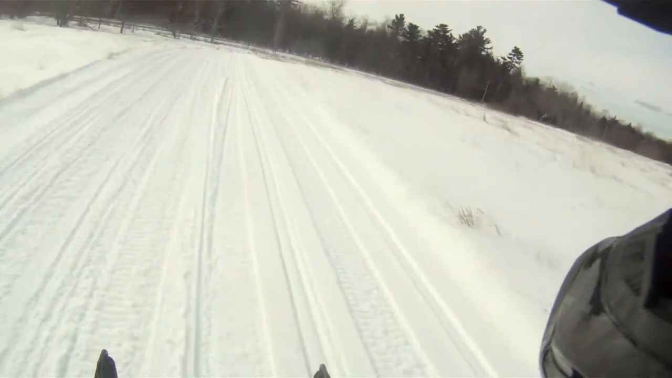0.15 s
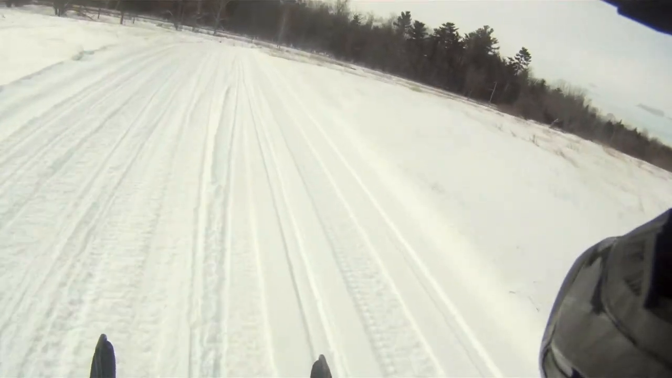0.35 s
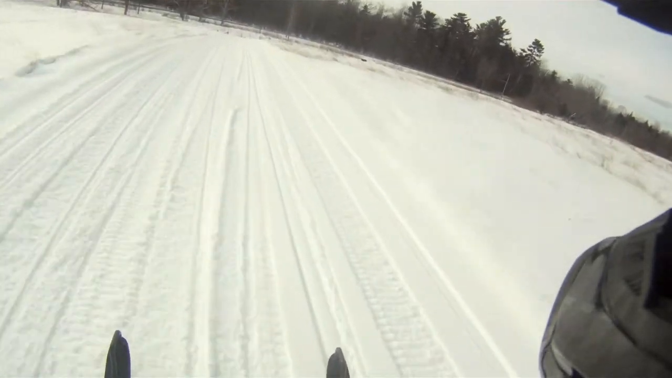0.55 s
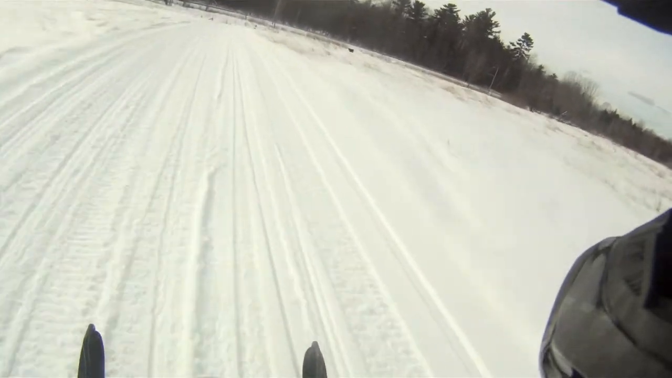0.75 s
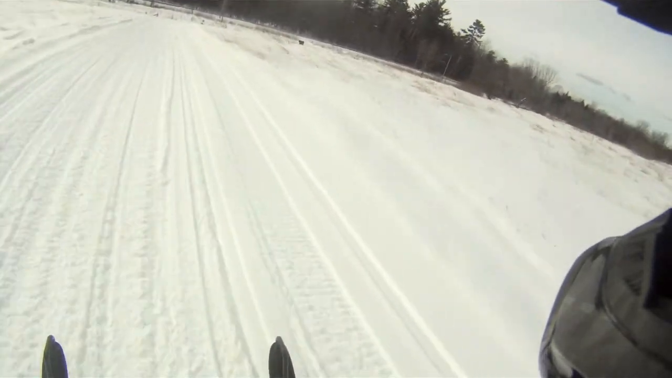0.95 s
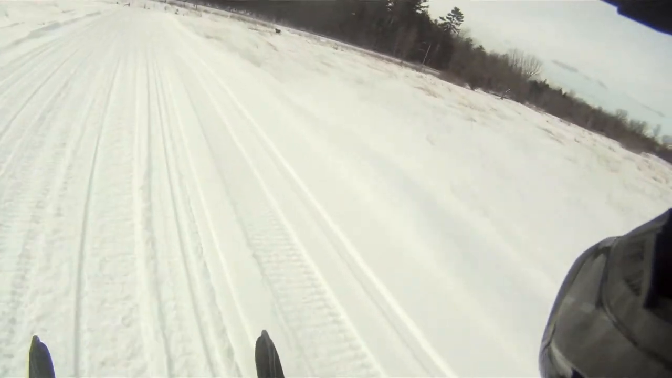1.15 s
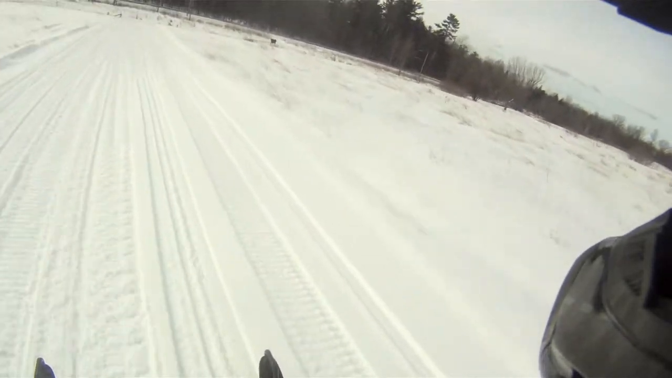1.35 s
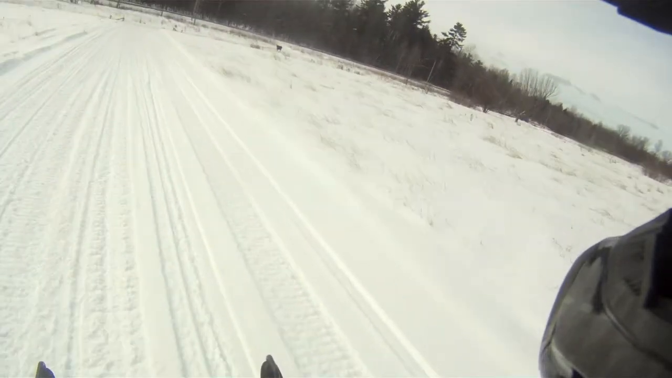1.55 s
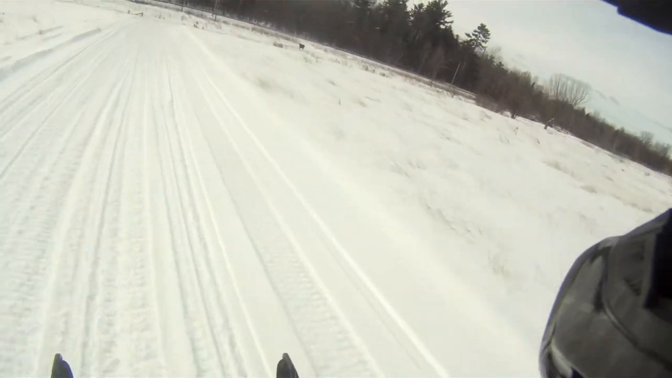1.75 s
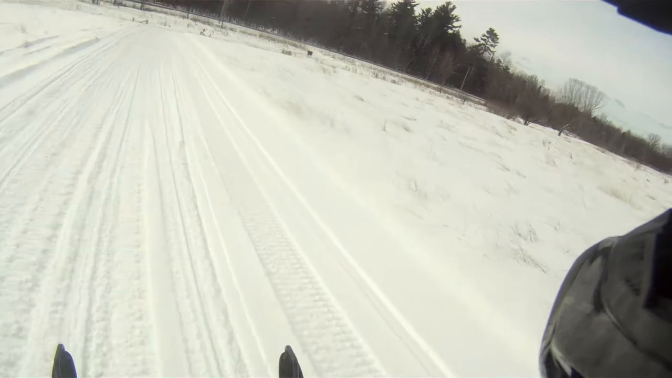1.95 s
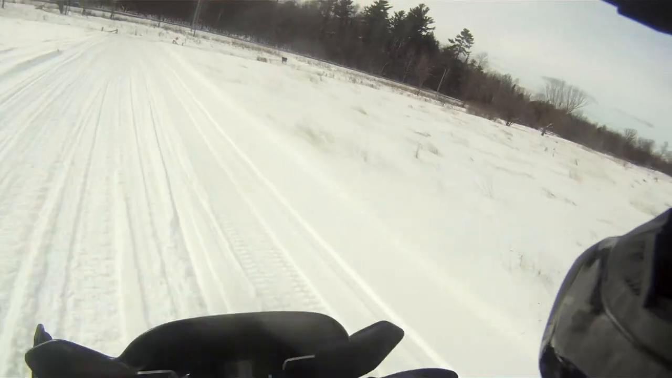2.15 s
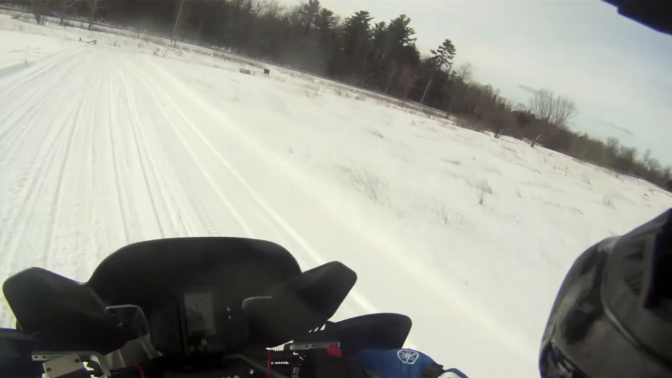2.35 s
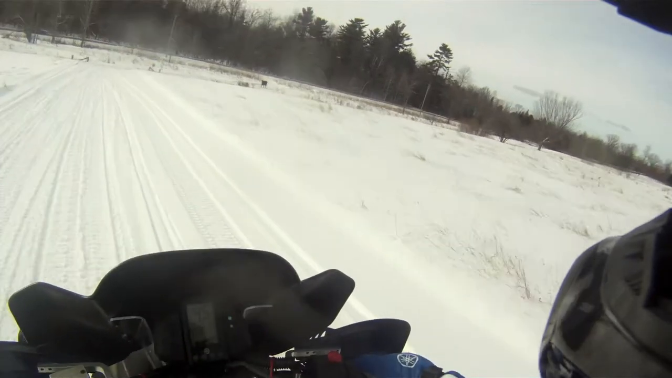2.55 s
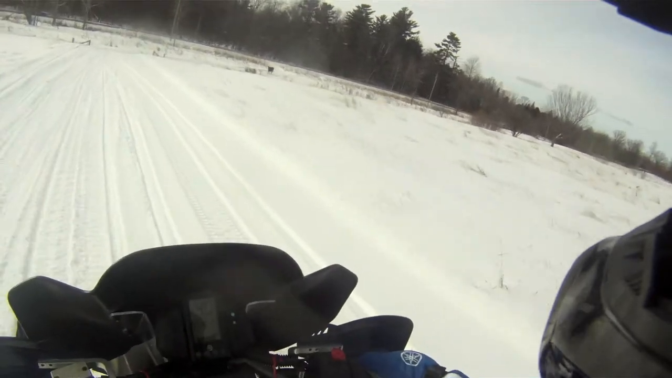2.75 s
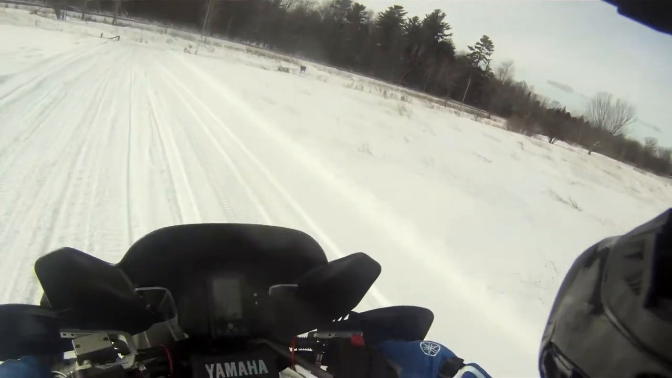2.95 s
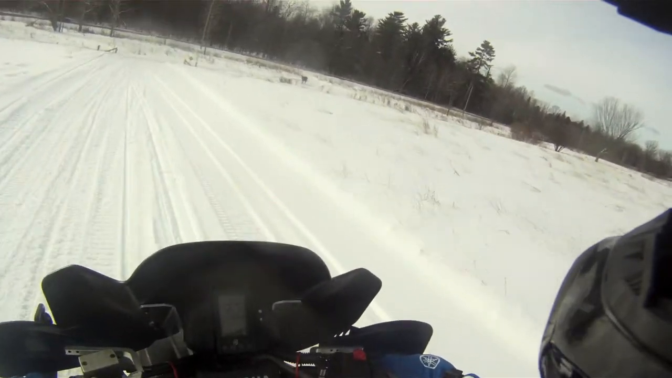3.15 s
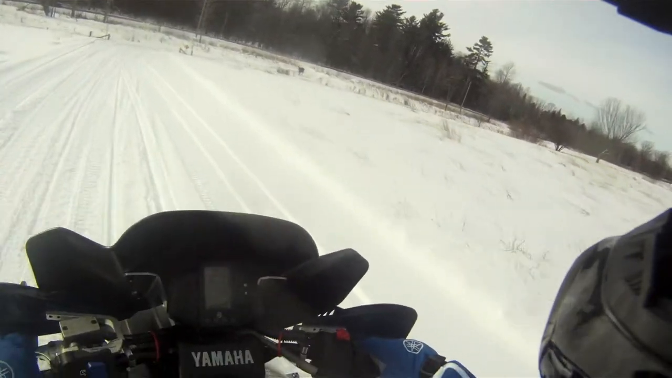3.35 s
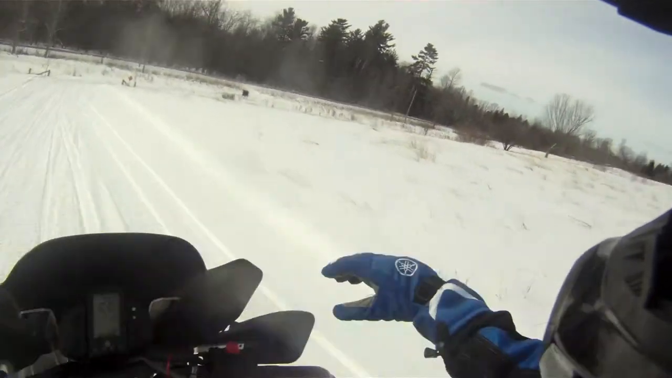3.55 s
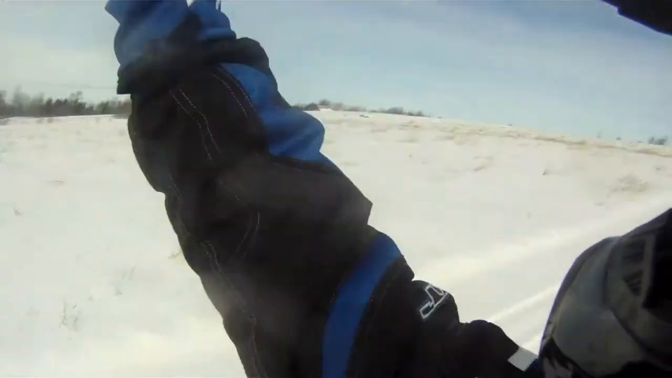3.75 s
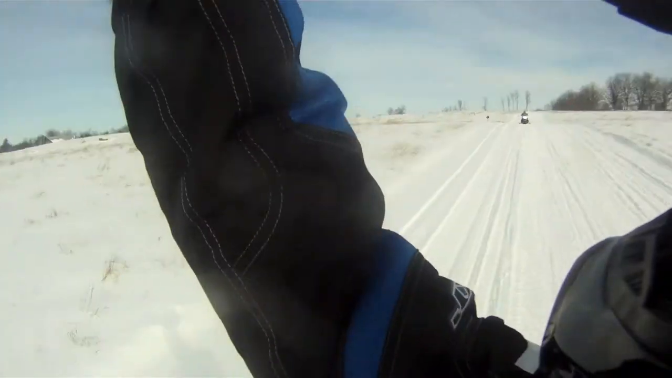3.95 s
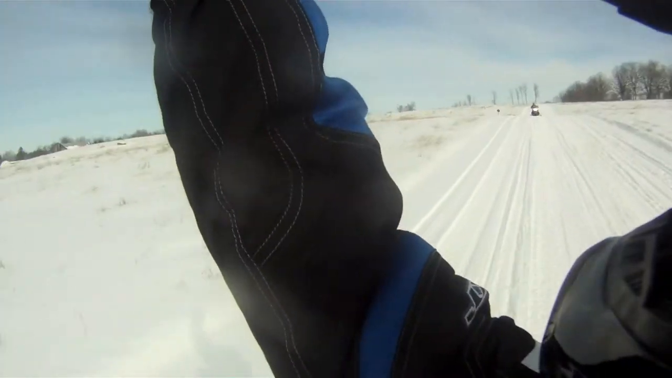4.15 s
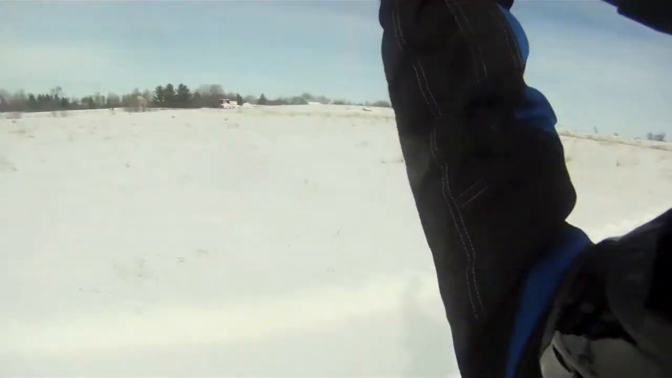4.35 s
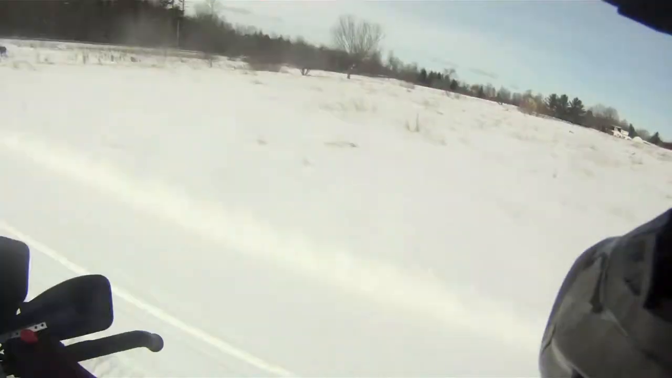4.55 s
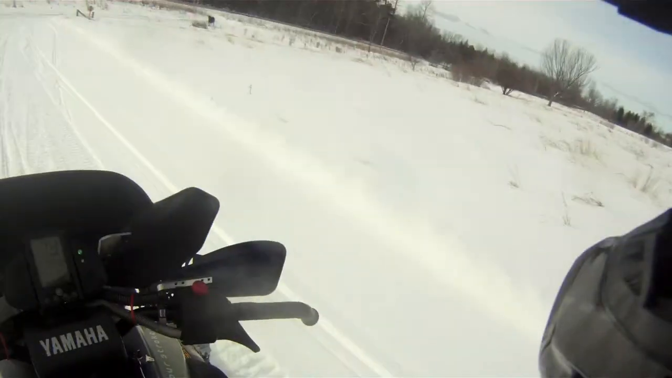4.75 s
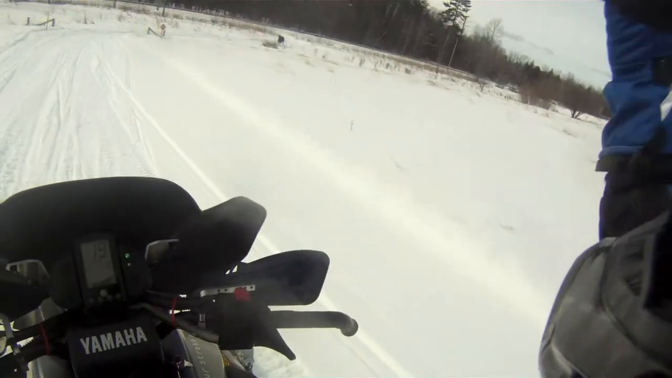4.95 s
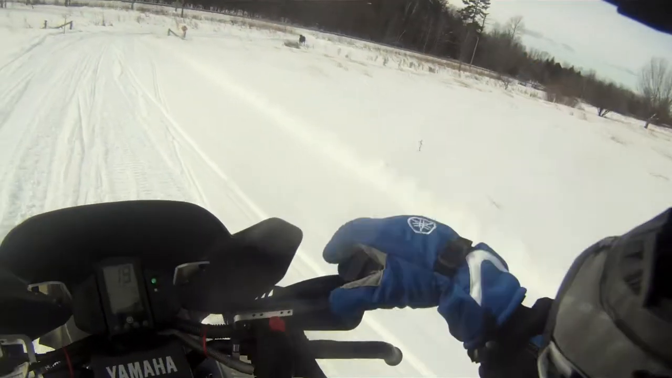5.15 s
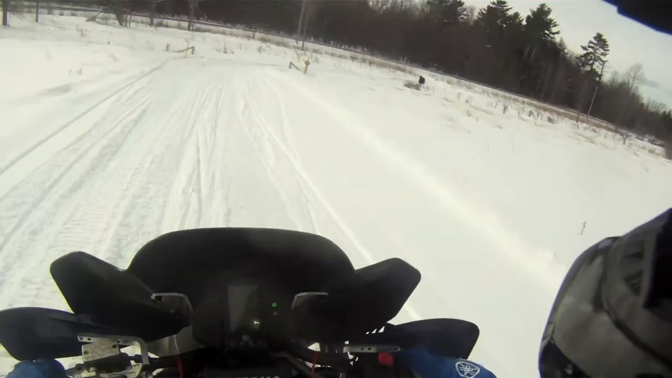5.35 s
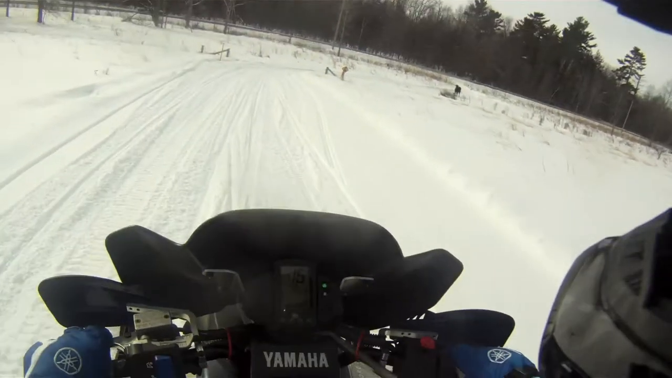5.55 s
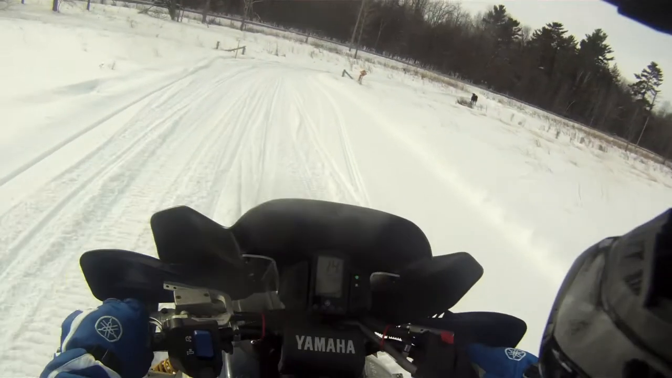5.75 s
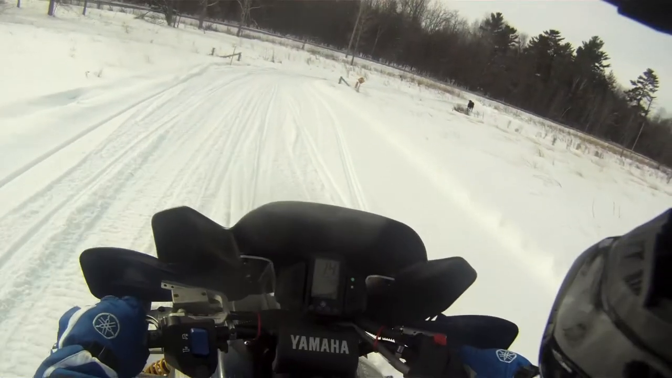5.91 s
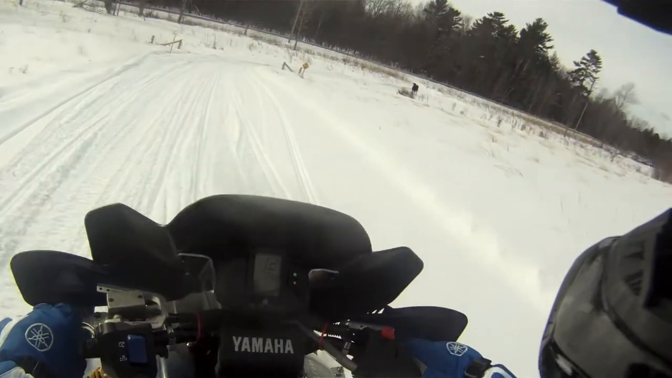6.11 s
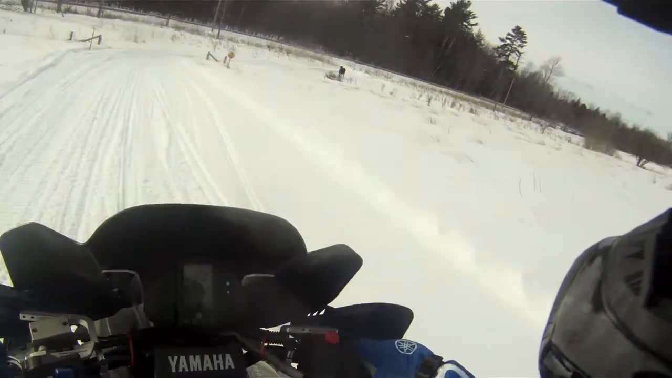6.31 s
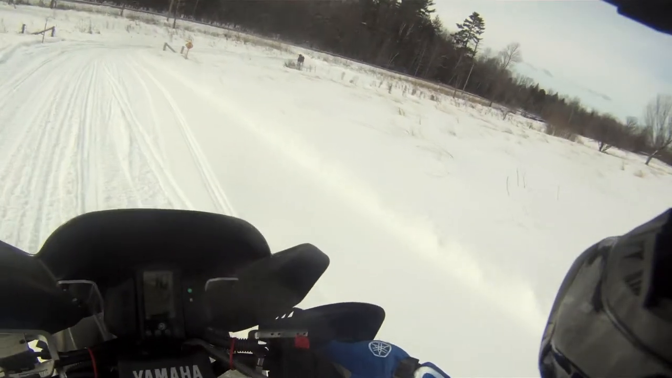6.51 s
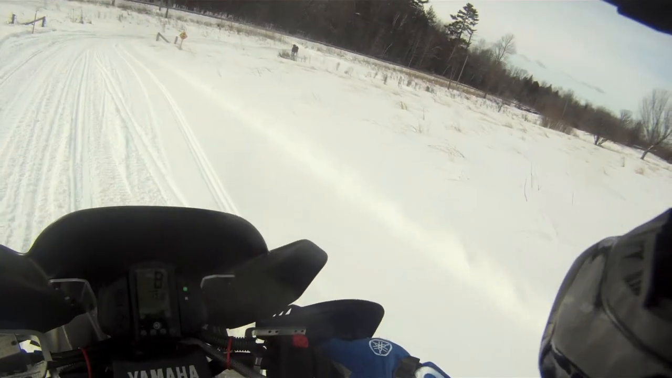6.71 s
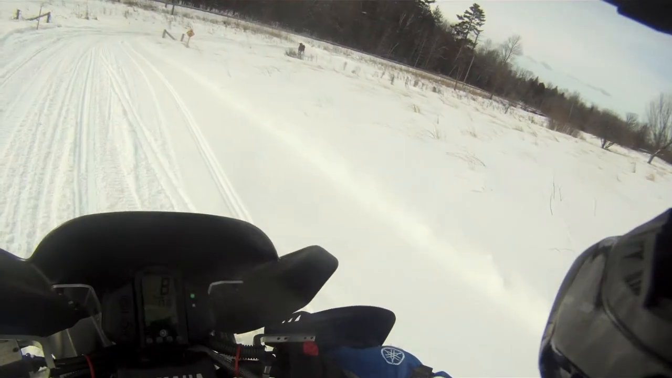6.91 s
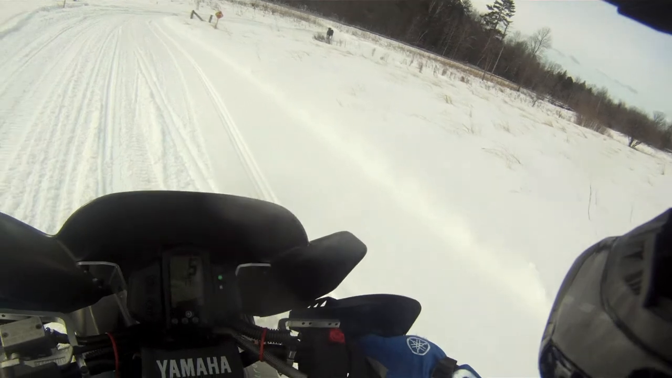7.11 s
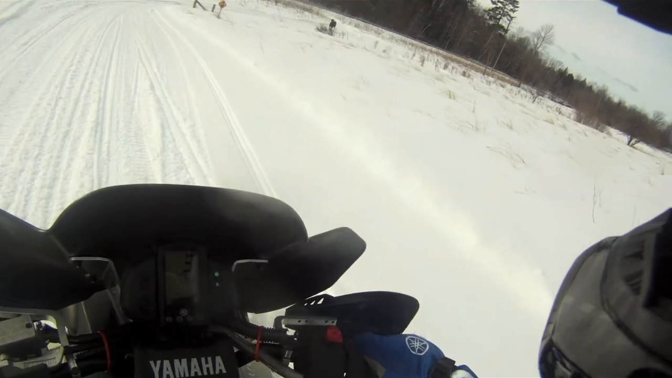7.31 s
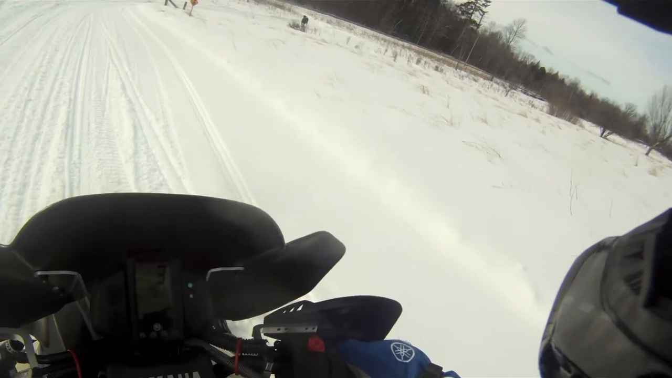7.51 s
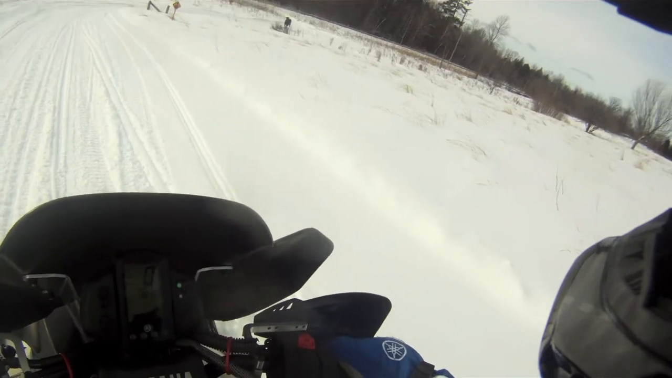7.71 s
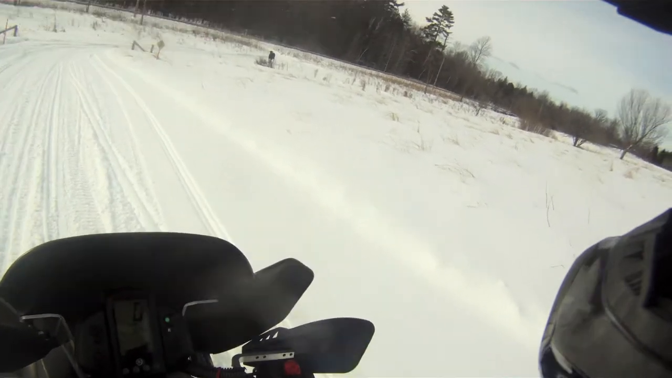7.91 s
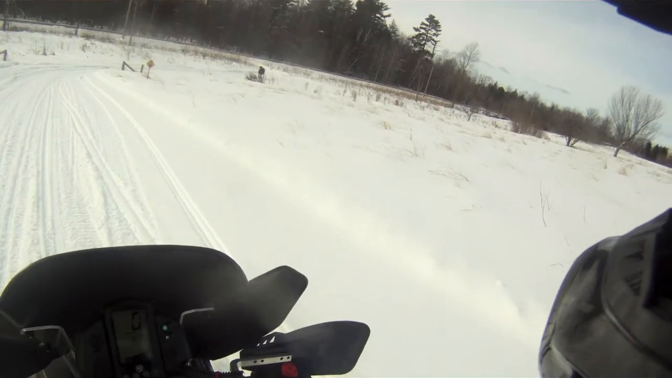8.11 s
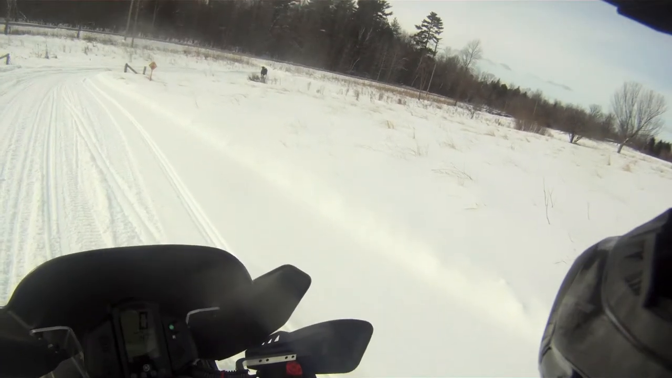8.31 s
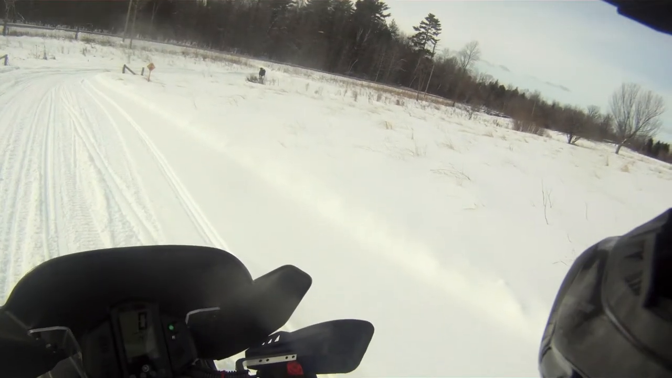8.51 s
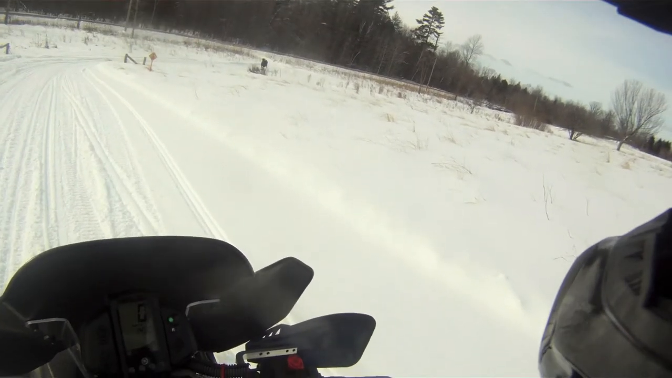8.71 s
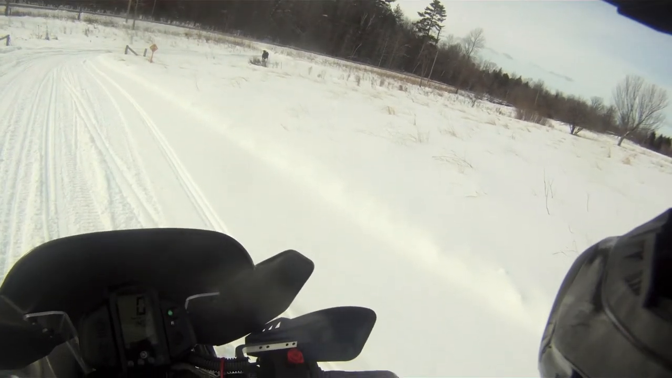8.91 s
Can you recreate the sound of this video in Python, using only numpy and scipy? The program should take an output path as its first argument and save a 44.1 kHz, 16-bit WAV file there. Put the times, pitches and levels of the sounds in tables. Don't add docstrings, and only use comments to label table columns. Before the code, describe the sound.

Heard from the rider's helmet, rushing snow and a raspy engine sink together, a brake groans downward, and a low lumpy idle remains.

```python
import sys
import numpy as np
from scipy import signal
from scipy.fft import rfft, irfft, next_fast_len
from scipy.io import wavfile
from scipy.ndimage import uniform_filter1d, map_coordinates

SR = 44100
rng = np.random.default_rng(int(sys.argv[2]) if len(sys.argv) > 2 else 0)


def transcribe(u):
    v = np.clip(np.atleast_2d(u).T, -1, 1)
    q = np.round(v * 32767).astype(np.int16)
    wavfile.write(sys.argv[1], SR, q)


def voltage_ratio(decibels):
    exponent = np.asarray(decibels, float) / 20
    return 10 ** exponent


N = 399987

# centre in Hz, width in Hz, level in dB.
CASE_MODES = [(1149, 67, 7.5), (1540, 116, 11), (1898, 241, 8), (3057, 310, -2), (3547, 99, 0.5),
              (5064, 466, 6.5)]


def unit(x):
    return x / np.sqrt(np.mean(x ** 2) + 1e-20)


def along(points, hz):
    f, v = np.transpose(points)
    return np.interp(np.log(hz + 1), np.log(f + 1), v)


def law(rows, control):
    at, *columns = np.transpose(rows)
    return [np.interp(control, at, column) for column in columns]


def curves(rows):
    return law(rows, np.arange(N) / SR)


def wobble(rate, count=N):
    knots = rng.standard_normal(int(count * rate / SR) + 4)
    return map_coordinates(knots, [np.arange(count) * rate / SR])


def filtered(x, response):
    m = next_fast_len(N + SR // 2)
    return irfft(rfft(x, m) * response(np.fft.rfftfreq(m, 1 / SR)), m)[..., :N]


def modes(table, f):
    return np.array([voltage_ratio(db) * 1j * f * w / (c * c - f * f + 1j * f * w) for c, w, db in table])


def rush(spectrum, patchy_db):
    z = signal.stft(rng.standard_normal(N), nperseg=512)[2]
    field = uniform_filter1d(rng.standard_normal(z.shape), size=5, axis=0)
    field = uniform_filter1d(field, size=6, axis=1)
    white = signal.istft(z * voltage_ratio(patchy_db * unit(field)), nperseg=512)[1][:N]
    return unit(filtered(white, lambda hz: voltage_ratio(along(spectrum, hz))))


def exhaust(cycle):
    # place 0-1, level in dB.
    firings = [
        (.99, -.5),
        (.23, .3),
    ]
    # delay in seconds, level in dB.
    answers = [
        (.0175, -10.5),
        (.0358, -19),
    ]
    # centre in Hz, width in Hz, level in dB.
    muffler = [(96, 30, -14), (188, 36, -2), (316, 30, -2), (425, 40, -3)]
    pushes = np.zeros(N + SR)
    for place, db in firings:
        at = np.flatnonzero(np.diff(np.floor(cycle - place)))
        pushes[at] = voltage_ratio(db + 1.2 * rng.standard_normal(N)[at])
    second_firing = at
    for delay_s, db in answers:
        pushes[second_firing + round(delay_s * SR)] += voltage_ratio(db) * pushes[second_firing]

    def pipe(f):
        rounded = np.exp(-(f / 210) ** 2) * f * f / (f * f + 35 ** 2)
        returned = .7 * np.exp(-2j * np.pi * f * .0052 - (f / 900) ** 2)
        suction = .38 * np.exp(2j * np.pi * f * .0012)
        return rounded * (1 - returned - suction) * (1 + modes(muffler, f).sum(axis=0))

    return unit(filtered(pushes[:N], pipe))


def crank(cycle, speed):
    # order, throttle open in dB, throttle shut in dB, speed below which it fades in cycles
    # per second, loss in dB per cycle per second.
    orders = [(1, -41, -51, 23, 5), (3, -49, -34, 36.4, 1.8), (4, -34, -32.5, 48, 0.6),
              (5, -43.5, -71, 45, 10), (8, -48, -46.5, 41, 10)]
    shut_at_s, shut_takes_s = 1.46, .1
    t = np.arange(N) / SR
    shut = np.clip((t - shut_at_s) / shut_takes_s + .5, 0, 1)
    boom_db = 13 * np.exp(-t / 0.28)
    out = np.zeros(N)
    for k, open_db, shut_db, fade_hz, loss in orders:
        db = open_db + shut * (shut_db - open_db) - loss * np.maximum(fade_hz - speed, 0)
        db = db + boom_db * (k == 5)
        level = (speed > 16) * voltage_ratio(db + 3 + 1.5 * wobble(12))
        out += level * np.sin(2 * np.pi * k * cycle + .3 * wobble(9))
    return out


def hum(cycle, fourth_db, eighth_db):
    fourth = np.cos(2 * np.pi * (4 * cycle + .05))
    eighth = np.cos(2 * np.pi * (8 * cycle - .15))
    return voltage_ratio(fourth_db + 2.5) * fourth + voltage_ratio(eighth_db) * eighth


def valves(cycle):
    # start 0-1, level in dB.
    bursts = [
        (.76, 0),
        (.99, .5),
        (.22, -8),
        (.49, -16),
    ]
    # frequency in Hz, level in dB per Hz.
    rasp = [(300, -49), (620, -21), (900, -11), (1300, -5.5), (1700, -6), (2300, -10.5), (2700, -5.5),
            (3600, -12), (4300, -17.5), (5400, -25), (5900, -27.5)]
    gate = np.zeros(N)
    for start, db in bursts:
        since = (cycle - start) % 1
        strength_db = rng.standard_normal(1000)[np.floor(cycle - start + 2).astype(int)]
        rise = 1 - np.exp(-(since / .052) ** 2)
        gate += voltage_ratio(db + strength_db) * rise * np.exp(-(since / .21) ** 2)
    grit = voltage_ratio(0.2 * wobble(300))
    return unit(gate * grit * rush(rasp, patchy_db=1.4))


def whine(table, tones_db, blur):
    fade_s = .025
    t, start_s, end_s = np.arange(N) / SR, table[0][0], table[-1][0]
    sounding = np.clip(np.minimum(t - start_s, end_s - t) / fade_s + 1, 0, 1)
    span = sounding > 0
    hz, level_db = (c[span] for c in curves(table))
    n = len(hz)
    unsteady_hz = hz * (1 + blur * wobble(110, count=n) + .003 * wobble(14, count=n))
    turn = 2 * np.pi * np.cumsum(unsteady_hz) / SR
    grid = np.arange(100, 6000, 10.)
    lift = np.abs(1 + modes(CASE_MODES, grid).sum(axis=0)) ** 1.08
    tones = np.zeros(n)
    for k, db in enumerate(tones_db):
        chatter = voltage_ratio(2.8 * wobble(45, count=n) + .4 * k * wobble(9, count=n))
        level = voltage_ratio(level_db + db + 3) * chatter * np.interp((k + 1) * hz, grid, lift)
        tones += level * np.sin((k + 1) * turn)
    out = np.zeros(N)
    out[span] = tones
    return sounding * out


def drive():
    # time in seconds, pitch in Hz, level in dB.
    belt = [
        (2.05, 849.3, -48),
        (2.17, 809, -47.5),
        (2.25, 775, -42),
        (2.38, 700, -41),
        (2.63, 649, -43.5),
        (2.72, 615, -51),
        (2.92, 572, -49),
        (3.2, 530, -53.5),
        (3.75, 495, -52.5),
    ]
    high_whistle = [
        (3.8, 3310, -54),
        (4.05, 3310, -48),
        (4.25, 3370, -47),
        (4.31, 3260, -50),
    ]
    belt_tones_db = (3, -7.5, -3.5)
    return whine(belt, belt_tones_db, blur=0.01888) + whine(high_whistle, (-3,), blur=0.0216)


def brake():
    # time in seconds, pitch in Hz, level in dB.
    first = [
        (4.34, 777.4, -50),
        (4.36, 747, -44),
        (4.42, 700, -44),
        (4.5, 698, -43.5),
        (4.55, 743, -43.5),
        (4.84, 724, -43.5),
        (4.92, 692, -45),
        (5.04, 649, -45),
        (5.25, 627, -49.5),
    ]
    second = [
        (5.33, 588, -45),
        (5.4, 575, -43),
        (5.5, 558, -43),
        (5.54, 528, -46),
        (5.7, 489, -44),
        (6.1, 418, -54),
        (6.42, 352, -53),
        (6.7, 288, -60),
        (7.12, 186, -58),
    ]
    other_pad = [
        (5.1, 1640, -60),
        (5.2, 1600, -42),
        (5.3, 1540, -50),
        (5.5, 1430, -39),
    ]
    first_tones_db = (-9, 0, -30, -6)
    second_tones_db = (-18, 0, -24, -23)
    squeezes = whine(first, first_tones_db, blur=0.0191) + whine(second, second_tones_db, blur=0.01547)
    return squeezes + whine(other_pad, (-12,), blur=0.00736)


def snow(hiss_db):
    # frequency in Hz, level in dB per Hz.
    hiss_colour = [(150, -53), (330, -9), (480, -30), (620, -14.5), (900, -8), (1300, -2), (1700, -7.5),
                   (2200, -4), (2700, -6), (3600, -11.5), (4300, -18), (5400, -21), (5900, -22.5)]
    flutter_db = 0.44 * wobble(8.2) + 0.11 * wobble(200)
    return voltage_ratio(hiss_db - 9 + flutter_db) * rush(hiss_colour, patchy_db=1.02)


def track(speed, rumble_db):
    # frequency in Hz, level in dB per Hz.
    drumming = [(12, -43), (20, -21), (54, -9), (103, -11), (182, -8), (235, -6), (274, -6.5), (600, -17.5),
                (780, -54), (1320, -120)]
    rumble = [(12, -45), (20, -14), (54, -8), (114, 1), (375, -5), (520, -9.5), (600, -15.5), (780, -10),
              (1320, -120)]
    fast = np.clip((speed - 40) / 16, 0, 1)
    both = np.sqrt(fast) * rush(drumming, patchy_db=1.5) + np.sqrt(1 - fast) * rush(rumble, patchy_db=2.0)
    return voltage_ratio(rumble_db + 0.38 * wobble(14)) * both


def buffet(turned):
    # frequency in Hz, level in dB per Hz.
    thud_colour = [(15, -30), (28, -3), (70, 0), (110, -14), (200, -120)]
    return turned * voltage_ratio(-47 + 1.2 * wobble(12)) * rush(thud_colour, patchy_db=6.0)


def camera_case(hiss, clatter, ring_db, bowed, turned):
    # centre in Hz, width in Hz, level in dB.
    shaded_bands = [(1299, 197, 0.5), (1676, 45, -3), (2267, 500, -4), (725, 96, 4)]
    rings = filtered(hiss + clatter, lambda f: modes(CASE_MODES, f))
    direct = hiss + voltage_ratio(-7) * clatter
    middle = voltage_ratio(-3 + 9.5 * bowed - 3.5 * turned)
    inside = direct + voltage_ratio(ring_db) * (rings.sum(axis=0) - rings[1]) + middle * rings[1]
    shade = np.clip(bowed * (0.83 + 0.2 * turned), 0, 1)
    inside = inside - shade * filtered(inside, lambda f: modes(shaded_bands, f).sum(axis=0))
    treble = filtered(inside, lambda f: 1 / (1 + (3900 / (f + 1)) ** 8))
    return inside + (voltage_ratio(3 * turned) - 1) * treble


def scene():
    # time in seconds, speed in cycles per second.
    slowing = [(0.0, 63.39), (1.44, 55.23), (1.6, 51.87), (2.16, 46.47), (2.4, 42.25), (3.68, 29.34),
               (4.0, 25.0), (4.4, 17.77), (4.6, 15.19), (4.76, 14.18), (5.04, 14.72), (6.32, 14.6),
               (6.4, 14.31), (7.2, 14.55), (7.64, 12.09), (8.48, 12.1), (8.56, 11.67), (9.1, 11.87)]
    # time in seconds, hiss in dB.
    glide = [(0, -17), (.48, -17.5), (.93, -18.5), (1.4, -20), (2.19, -23.5), (2.65, -26.5), (3.2, -30),
             (3.76, -30), (4.14, -34.5), (4.5, -31.5), (4.65, -34.5), (5.56, -36), (6.09, -38.5),
             (7.12, -42.5), (8.06, -45.5), (9.07, -48.5)]
    # hiss in dB, rumble in dB, case ring in dB.
    with_glide = [(-48, -56.5, 3), (-45, -54.5, 4.5), (-33.5, -41.5, 2), (-27.5, -35.5, 2.5), (-19, -35, 0),
                  (-17, -33.5, 1.5)]
    # speed in cycles per second, valve clatter in dB, exhaust beat in dB,
    # fourth hum in dB, eighth hum in dB.
    with_speed = [(12.1, -42, -39.5, -49.5, -95), (14.75, -41, -36.5, -56, -52),
                  (19, -39.5, -43.5, -62, -72), (35.8, -37.5, -47.5, -90, -90),
                  (45.6, -30.5, -50, -90, -90), (63, -35, -66, -90, -90)]
    # time in seconds, bowed 0-1, turned aside 0-1.
    head = [(0, 0, 0), (2, 0, 0), (2.5, 0.82, 0), (3, 1, 0), (3.72, 1, 0.33), (3.84, 0.63, 1),
            (4.3, 0.9, 0.6), (4.5, 1, 0.8), (5.1, 0.95, 0.85), (5.6, 0.8, 0.42), (6.2, 1, 0.25),
            (6.6, 0.95, 0), (7.2, 0.57, 0.02), (9.07, 0.5, 0.14)]
    speed, = curves(slowing)
    cycle = np.cumsum(speed) / SR - .444
    hiss_db, = curves(glide)
    rumble_db, ring_db = law(with_glide, hiss_db)
    valve_db, beat_db, fourth_db, eighth_db = law(with_speed, speed)
    bowed, turned = np.clip(curves(head), 0, 1)
    engine = voltage_ratio(beat_db) * exhaust(cycle) + crank(cycle, speed) + hum(cycle, fourth_db, eighth_db)
    clatter = voltage_ratio(valve_db - 6.5) * valves(cycle)
    ringing = camera_case(snow(hiss_db), clatter, ring_db, bowed, turned)
    mix = engine + ringing + drive() + brake() + track(speed, rumble_db) + buffet(turned)
    return mix[None]


def roll_off(x):
    return signal.sosfilt(signal.butter(12, 16580, fs=SR, output="sos"), x)


def record(dry):
    hold_hz, top_hz = 12000, 15440
    band = filtered(dry, lambda hz: np.clip((hold_hz / 2 - hz) / 250, 0, 1) ** .5)
    sampled = band * (1 + 2 * np.cos(2 * np.pi * hold_hz * np.arange(N) / SR))
    held = filtered(sampled, lambda hz: np.sinc(hz / hold_hz) / np.sinc(hz / (4 * hold_hz)) * (hz < top_hz))
    return roll_off(held)


dry = scene()
out = record(dry)
transcribe(out)
```